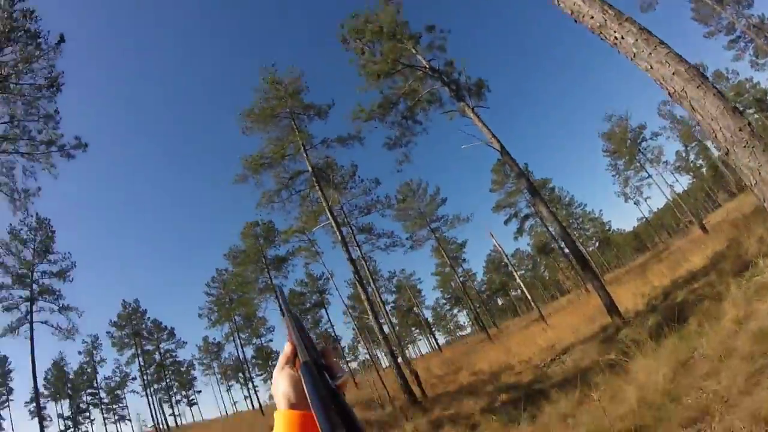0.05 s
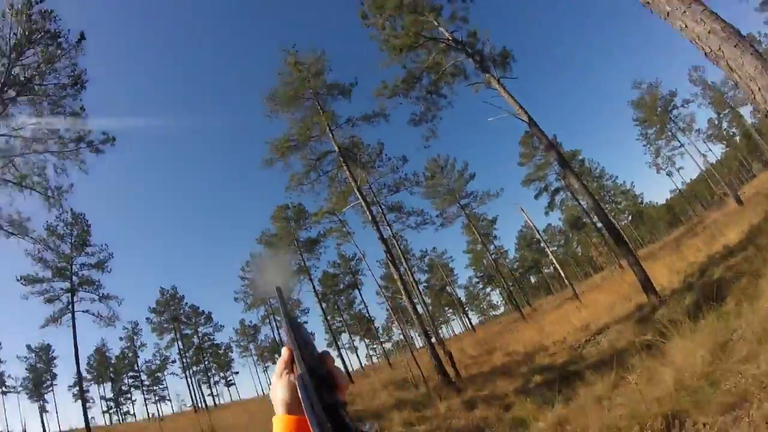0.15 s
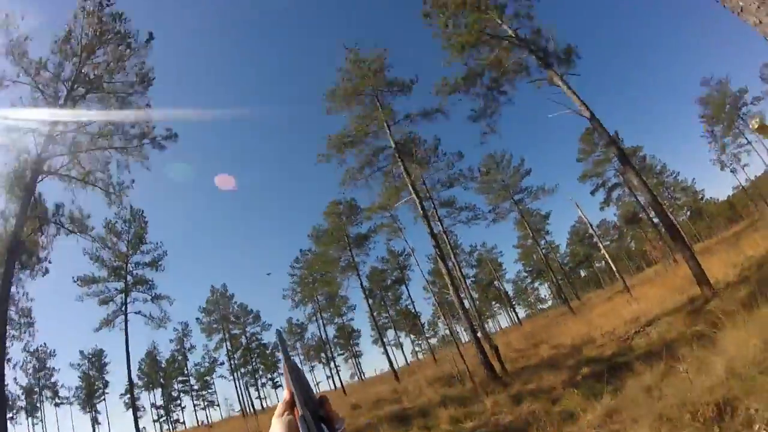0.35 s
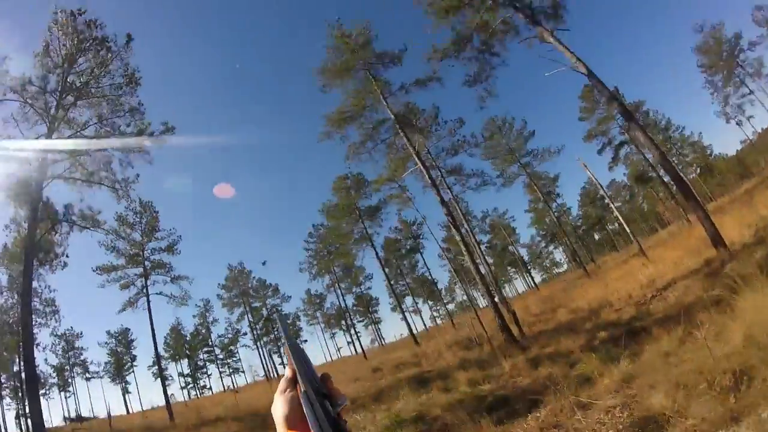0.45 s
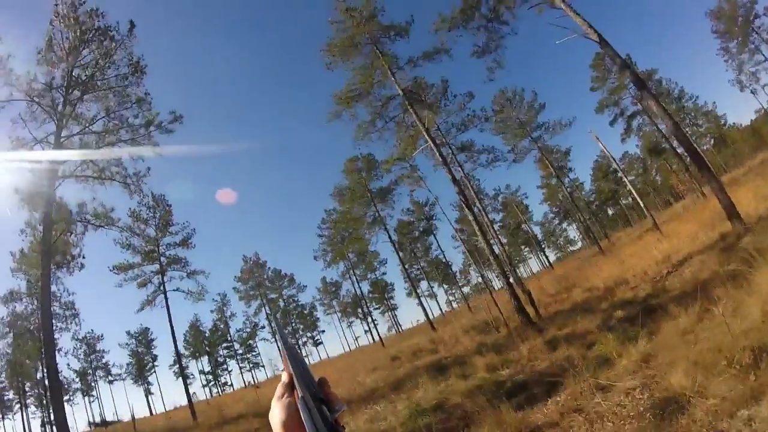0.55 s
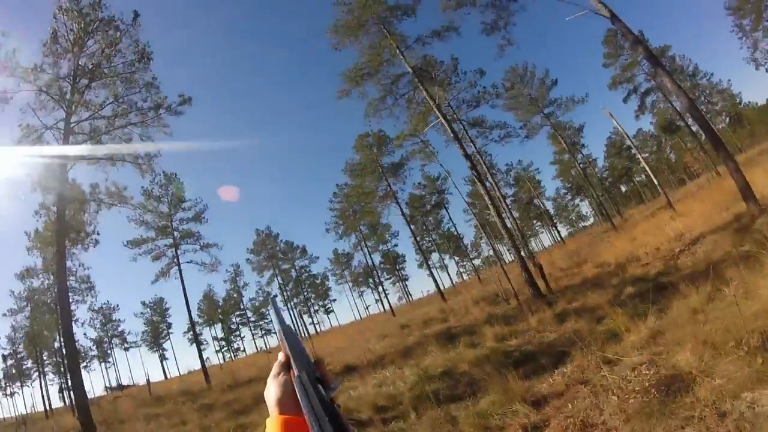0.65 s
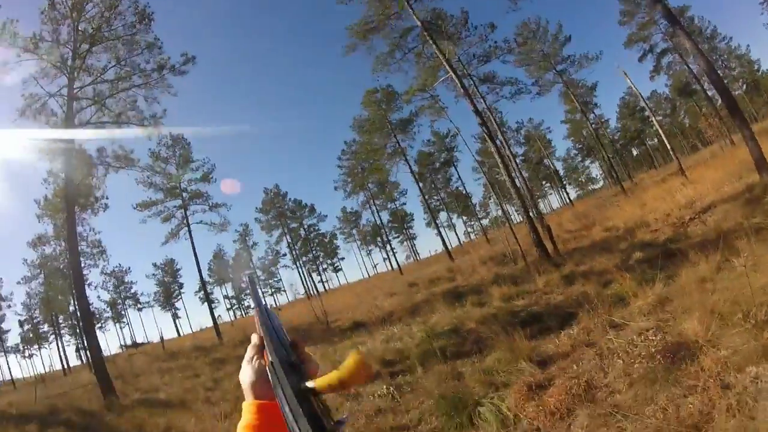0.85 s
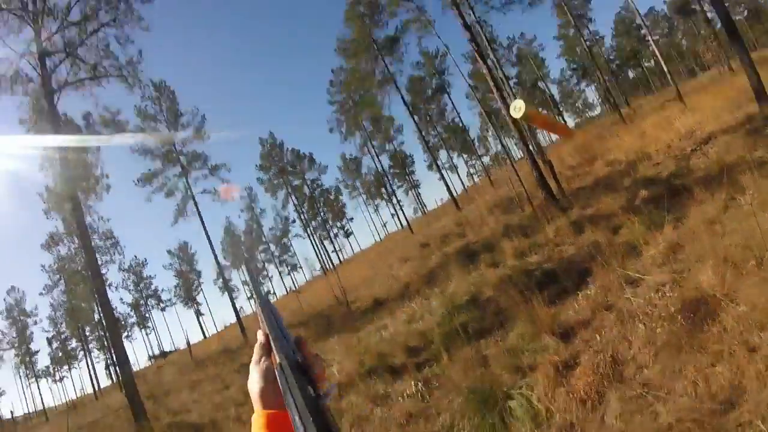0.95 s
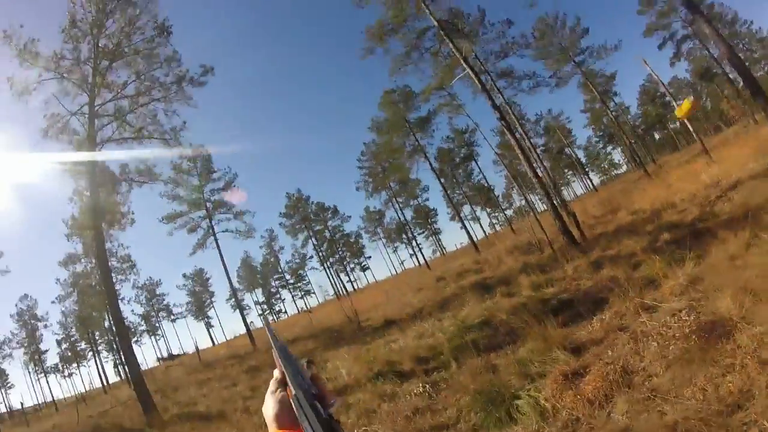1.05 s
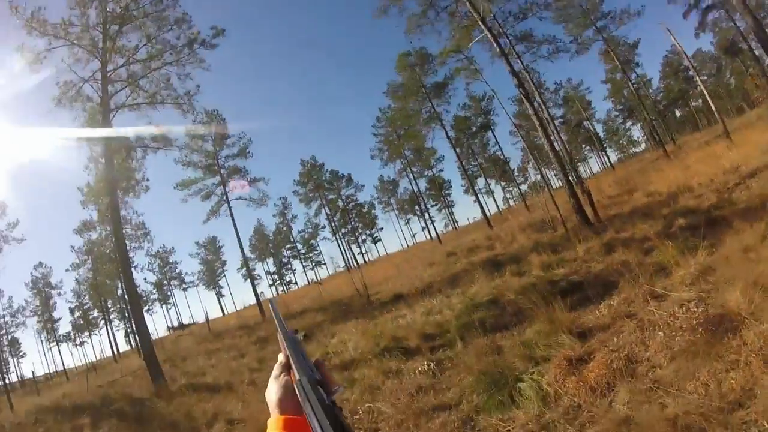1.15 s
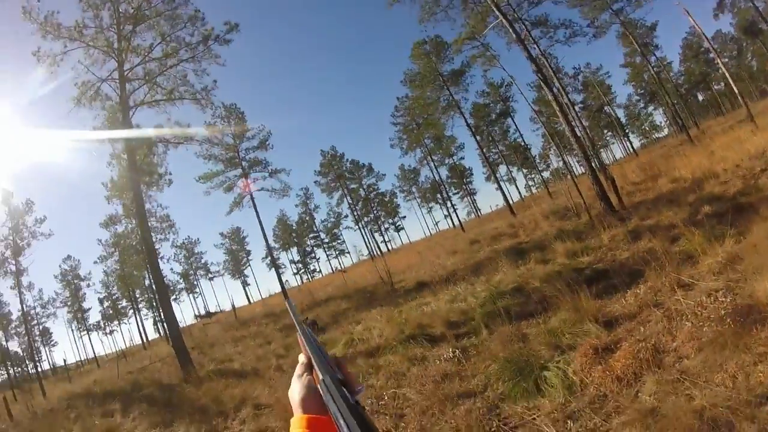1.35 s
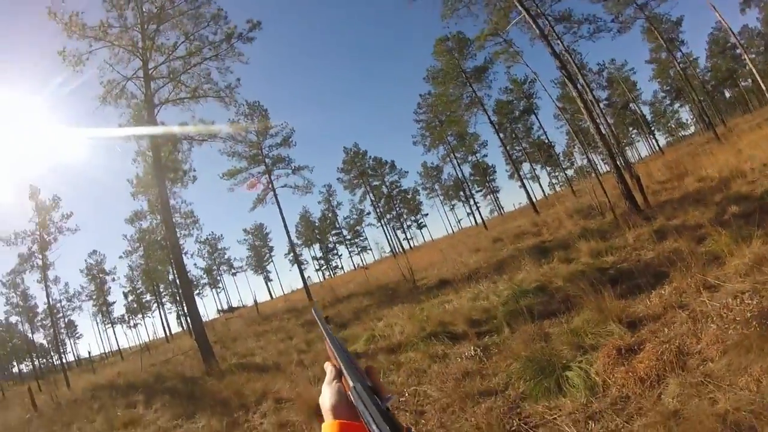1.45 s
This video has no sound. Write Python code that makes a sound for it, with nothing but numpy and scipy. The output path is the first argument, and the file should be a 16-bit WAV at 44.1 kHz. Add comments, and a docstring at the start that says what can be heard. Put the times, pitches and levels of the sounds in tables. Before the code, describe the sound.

Two loud, close shotgun blasts crack through open woodland after a brief rumble of wind on the microphone. The gun clacks open and shut after each shot, while the trees throw back a long, darkening echo.

```python
"""A self-loading shotgun fires twice in open pine woods, close to a head-worn camera.
Wind rumbles on the microphone, and the trigger and hammer click. A sharp crack comes next, then
a muzzle blast that overloads the microphone and sets the camera housing and the gun's steel ringing.
The ground and single trunks throw the blast back while the gun clacks open and shut.
The second shot follows 0.7 s after the first, and the woods answer with a long, darkening tail."""
import sys
import numpy as np
from scipy import signal
from scipy.io import wavfile

SR = 44100
rng = np.random.default_rng(int(sys.argv[2]) if len(sys.argv) > 2 else 0)


def to_wav(s):
    """Save 16-bit WAV."""
    ch = np.atleast_2d(s).T  # columns
    pcm = np.round(np.clip(ch, -1, 1) * 32767)  # PCM
    wavfile.write(sys.argv[1], SR, pcm.astype(np.int16))


N = 66150

# A TONE table gives only the balance of low and high pitches; t60 is the time to fade by 60 dB.
# Wind, loudest before the first shot and dipping after each blast: t/s, rumble/dB, rustle/dB
WIND_LEVELS = [(0, -28, -63.5), (.09, -36.5, -57), (.17, -31, -53.5), (.225, -34.5, -52.5),
               (0.269, -53, -67), (.37, -50, -66.5), (.47, -43.5, -60), (.78, -48.5, -65), (.88, -46, -64),
               (.99, -62.5, -63), (1.28, -51, -66), (1.38, -50.5, -70.5), (1.439, -44.5, -59),
               (1.5, -49.5, -71)]
# Low buffeting of the wind: f/Hz, level/dB
RUMBLE_TONE = [(15, -3), (40, 0.5), (120, -4), (220, -12), (400, -19), (700, -37.5), (1500, -58.5)]
# Light rustle of the wind: f/Hz, level/dB
RUSTLE_TONE = [(300, -4), (1000, 0.5), (2900, 3), (4800, -11.5), (8500, -10), (12000, -18), (15500, -27)]
# Knocks of trigger, hammer and bolt: t/s, level/dB, fall/s, tilt/(dB per octave), relative thud/dB
GUN_KNOCKS = [(0.0473, -48.5, 0.0065, -0.5, -34), (0.1882, -34.5, .005, -2, -5.5),
              (.259, -21.5, 0.0035, 3, -10.5), (0.3397, -34.5, .004, 5.5, -11),
              (0.3831, -23, 0.0042, 0.5, -1.5), (0.3895, -12, 0.003, -1, -7),
              (0.4034, -28.5, 0.0085, -2, -26), (.8588, -56, .002, 4.5, -19),
              (.9110, -39, 0.0043, 6, -19.5), (0.9495, -22.5, 0.0027, 6, -7), (1.059, -40.5, .004, -3, 19),
              (1.0741, -14.5, 0.0051, -1.5, -1.5), (1.0902, -25.5, .004, -1.5, -4)]
# Struck or scraped steel: f/Hz, level/dB
STEEL_TONE = [(200, -18), (750, -16), (1100, -9.5), (1700, -0.5), (2300, -2.5), (3000, -1), (4000, -8.5),
              (5500, -14), (7500, -15.5), (10000, -22.5), (13000, -21), (15500, -35)]
# The bolt sliding forward before it slams shut: end/s, length/s, level/dB
BOLT_SLIDES = [(0.377, 0.027, -43.5), (1.073, .03, -34.5)]
# The two shots: crack t/s, crack/dB, blast t/s, blast/dB, push/dB, roar/dB, housing/dB, tail/dB
GUNSHOTS = [(0.2284, -8.5, .2328, 0.5, -11.5, -4, -7.5, 0), (.9190, -6.5, .9229, 2, -28, -8.5, -9.5, -3)]
# The sharp crack: f/Hz, level/dB
CRACK_TONE = [(100, -9.5), (700, -11.5), (1300, 5), (2100, -10), (3000, -1), (4500, -7.5), (6200, -18),
              (8000, -9), (12000, -17.5), (15500, -33.5)]
# Gas roaring from the muzzle: f/Hz, level/dB
ROAR_TONE = [(100, -11.5), (450, -8.5), (680, -14.5), (980, -13.5), (1190, -0.5), (1650, -1), (2050, -10),
             (3200, -1), (4500, -10), (6200, -14), (8000, -12.5), (12000, -17), (15500, -29.5)]
# Ringing notes of the camera housing: f/Hz, level/dB, t60/s
HOUSING_NOTES = [(460, -14.5, 0.022), (1184, -2.5, .024), (1645, -5.5, 0.033), (2670, -10.5, 0.022),
                 (3250, -7, .018), (4583, -29, .018), (7190, -12, .018)]
# Ringing notes of the gun's steel: f/Hz, level/dB, t60/s
STEEL_NOTES = [(2840, -49, .6), (3020, -43.5, .6), (8400, -55, .5)]
# Echoes from nearby trees: f/Hz, level/dB, t60/s
NEAR_TREES_TONE = [(100, -18, .8), (350, 11, .9), (800, -10.5, .8), (1600, 2, 0.58), (2200, -5, .7),
                   (2950, 1.5, 0.81), (4220, -11, 0.87), (8500, -14, 0.76), (13000, -20, 0.82),
                   (15500, -34.5, .35)]
# Echoes from distant trees: f/Hz, level/dB, t60/s
FAR_TREES_TONE = [(40, -22.5, 1.7), (110, -7.5, 7.7), (240, 1.5, 5.8), (450, 1.5, 2.33), (720, -14.5, 6.8),
                  (1050, -16, 5.7), (1713, -6.5, 4.07), (2100, -20, 4.3), (2900, -9, 2.01),
                  (4420, -30, 2.4), (9000, -43, 1.5), (15000, -60.5, 1.4)]
# Echoes from single trunks: t/s, level/dB, relative bark noise/dB
TRUNK_ECHOES = [(0.2963, -17, -9.5), (0.3507, -25, -18), (0.3684, -32.5, 1.5), (0.413, -19.5, -10.5),
                (.4400, -26, -8.5), (.4670, -33, -9), (.5060, -25.5, -15), (0.549, -24, -28),
                (0.5547, -20, -19.5), (0.5913, -29.5, -13), (0.827, -27, -14.5), (0.9854, -20.5, -5.5),
                (1.1010, -17.5, -19), (1.1210, -25, -8), (1.1302, -27, -12), (1.1390, -20, -15),
                (1.1560, -21.5, -11.5), (1.2076, -28, -18), (1.2445, -24, -18), (1.4380, -29.5, -11)]
# Sound scattered by rough bark: f/Hz, level/dB
BARK_TONE = [(100, -6.5), (450, 7.5), (900, -0.5), (1600, 1.5), (3000, -5.5), (5000, -20), (9000, -45),
             (15000, -64)]


def amp(db):
    """Turn decibels into a number to multiply by."""
    return 10 ** (np.asarray(db) / 20)


def look_up(table, hz, column=1):
    """Read between the rows of a table, on a logarithmic frequency scale."""
    columns = np.transpose(table)
    return np.interp(np.log(hz + 1), np.log(columns[0] + 1), columns[column])


def add(mix, start_s, sound):
    """Mix a sound in at the given time."""
    part = mix[max(round(start_s * SR), 0):][:len(sound)]
    part += sound[:len(part)]


def seconds(size=4096):
    """The time of each sample."""
    return np.arange(size) / SR


def colour(sound, tone, tilt_db=0, size=4096):
    """Filter a sound with a tone table; a positive tilt makes it brighter."""
    hz = abs(np.fft.fftfreq(size, 1 / SR))
    log_gain = np.log(amp(look_up(tone, hz) + tilt_db * np.log2(1 + hz / 1000)))
    response = np.exp(np.conj(signal.hilbert(log_gain)))  # never rings ahead of the sound
    taps = np.fft.ifft(response).real[:size // 2]
    return signal.fftconvolve(sound, taps / np.linalg.norm(taps))[:len(sound)]


def burst(rise_s, hold_s, fall_s):
    """A spray of tiny random hits that swells, holds and fades."""
    t = seconds()
    loudness = np.minimum(t / rise_s, 1) * np.exp(-np.maximum(t - hold_s, 0) / fall_s)
    return rng.choice([-1., 1.], len(t)) * loudness


def thump(low_hz, high_hz, jump_s=0.0012):
    """A pressure jump and its swing back, muffled and scaled to a peak of 1."""
    age = seconds() / jump_s
    band = signal.butter(2, [low_hz, high_hz], "band", fs=SR, output="sos")
    wave = signal.sosfilt(band, (age - 1) * np.exp(-age))
    return wave / abs(wave).max()


def wind():
    """Air buffets the microphone with a low rumble and a faint rustle."""
    out = np.zeros(N)
    times, rumble_db, rustle_db = np.transpose(WIND_LEVELS)
    for db, tone in [(rumble_db, RUMBLE_TONE), (rustle_db, RUSTLE_TONE)]:
        noise = colour(rng.standard_normal(2 * N), tone)[N:]
        out += amp(np.interp(seconds(N), times, db)) * noise
    return out


def moving_parts(rattle_db=-23.5, rattle_fall_s=0.029):
    """The bolt scrapes forward; steel parts strike and rattle, with a thud through the stock."""
    out, t = np.zeros(N), seconds(size=8192)
    for end_s, length_s, db in BOLT_SLIDES:
        speed = t / length_s * (t < length_s)
        scrape = colour(np.sqrt(speed) * rng.standard_normal(len(t)), STEEL_TONE, tilt_db=1.5)
        add(out, end_s - length_s, amp(db) * scrape)
    for start_s, db, fall_s, tilt_db, thud_db in GUN_KNOCKS:
        clack = colour(burst(rise_s=0.00025, hold_s=0.0012, fall_s=fall_s), STEEL_TONE, tilt_db)
        thud = amp(thud_db) * thump(low_hz=190, high_hz=360)
        add(out, start_s, amp(db) * (clack + thud))
        rattle = rng.standard_normal(len(t)) * np.exp(-t / rattle_fall_s)
        add(out, start_s, amp(db + rattle_db) * colour(rattle, STEEL_TONE, tilt_db=0.5))
    return out


def crack():
    """A very short, bright snap of noise."""
    return colour(burst(rise_s=0.0016, hold_s=0.002, fall_s=0.0028), CRACK_TONE)


def shots(rise_s=0.0012, peak_s=0.0021, width_s=0.00128, push_s=0.0027,
          ground_delay_s=0.0078, ground_width_s=0.00077):
    """Each shot is a crack, a blast with roaring gas, then a bounce off the grassy ground."""
    out, t = np.zeros(N), seconds()
    blast_age = (t - peak_s) / width_s
    blast = (1 - 2 * blast_age ** 2) * np.exp(-blast_age ** 2)  # one peak between two dips
    blast *= np.minimum(t / rise_s, 1)
    push_age = t / push_s
    push = -push_age * (2 - push_age) * np.exp(1 - push_age)  # slow pressure swing under the blast
    bounce_age = (t - peak_s) / ground_width_s
    bounce = 2 * bounce_age * np.exp(-bounce_age ** 2)
    for crack_s, crack_db, blast_s, blast_db, push_db, roar_db, housing_db, _ in GUNSHOTS:
        add(out, crack_s, amp(crack_db) * crack())
        add(out, crack_s - 0.0016, amp(crack_db - 18) * crack())  # a faint snap leads into the crack
        roar = colour(burst(rise_s, hold_s=0.0031, fall_s=0.0013), ROAR_TONE)
        add(out, blast_s, amp(blast_db) * blast + amp(push_db) * push + amp(roar_db) * roar)
        add(out, blast_s, amp(housing_db) * housing_ring())
        add(out, blast_s + ground_delay_s, amp(-26.5) * roar + amp(-9) * bounce)
    return out


def housing_ring():
    """The blast makes the camera housing ring briefly."""
    t = seconds()
    return sum(amp(db - 60 * t / t60) * np.sin(2 * np.pi * hz * t) for hz, db, t60 in HOUSING_NOTES)


def steel_ring(spread_hz=90):
    """The gun rings on after each shot; groups of four close notes waver as they fade."""
    out, t = np.zeros(N), seconds(N)
    for _, _, blast_s, *_ in GUNSHOTS:
        for hz, db, t60 in STEEL_NOTES:
            offset, phase = rng.uniform(-0.83, 1, (2, 4, 1))
            notes = np.sin(2 * np.pi * ((hz + spread_hz * offset) * t + phase))
            add(out, blast_s, amp(db - 60 * t / t60) * notes.sum(0) / 2)
    return out


def tree_echoes(tone, rise_s, echoes_per_s, spread_db=1.5):
    """Many small echoes of uneven size blur together; the highest pitches die first."""
    echoes = rng.choice([-1., 1.], N) * (rng.random(N) < echoes_per_s / SR)
    echoes *= amp(spread_db * np.clip(rng.standard_normal(N), -2, 2))
    hz, t, spectrum = signal.stft(colour(echoes / echoes.std(), tone), SR, nperseg=256)
    t60 = look_up(tone, hz, column=2)[:, None]
    tail = signal.istft(spectrum * amp(-60 * t / t60), SR)[1][:N]
    return tail * np.minimum(seconds(N) / rise_s, 1)


def woods():
    """After each shot, near trees return a bright wash and far trees a low roll."""
    out = np.zeros(N)
    for _, _, blast_s, *_, tail_db in GUNSHOTS:
        near = amp(-32) * tree_echoes(NEAR_TREES_TONE, rise_s=0.0057, echoes_per_s=16000)
        far = amp(-31.5) * tree_echoes(FAR_TREES_TONE, rise_s=0.15, echoes_per_s=1500)
        add(out, blast_s, amp(tail_db) * (near + far))
    return out


def trunks():
    """Single trunks throw the blast back as a dull thump, roughened by their bark."""
    out = np.zeros(N)
    for start_s, db, bark_db in TRUNK_ECHOES:
        bark = colour(burst(rise_s=0.0005, hold_s=0.0014, fall_s=0.0031), BARK_TONE)
        add(out, start_s, amp(db) * (amp(bark_db) * bark - thump(low_hz=189, high_hz=481)))
    return out


def scene():
    """Gun, echoes and wind meet at one microphone."""
    return (shots() + moving_parts() + steel_ring() + trunks() + woods() + wind())[None]


def record(dry, ceiling=0.98, hardness=5, cutoff_hz=15350):
    """The overloaded microphone flattens the loudest peaks; then the highest treble is cut."""
    flattened = dry / (1 + abs(dry / ceiling) ** hardness) ** (1 / hardness)
    treble_cut = signal.firwin(255, cutoff_hz, window=("kaiser", 9), fs=SR)
    return signal.oaconvolve(flattened, treble_cut[None], "same")


dry = scene()
out = record(dry)
to_wav(out)
```